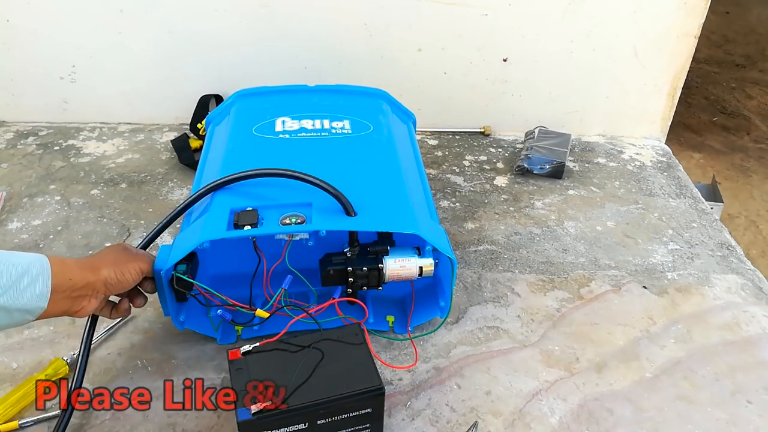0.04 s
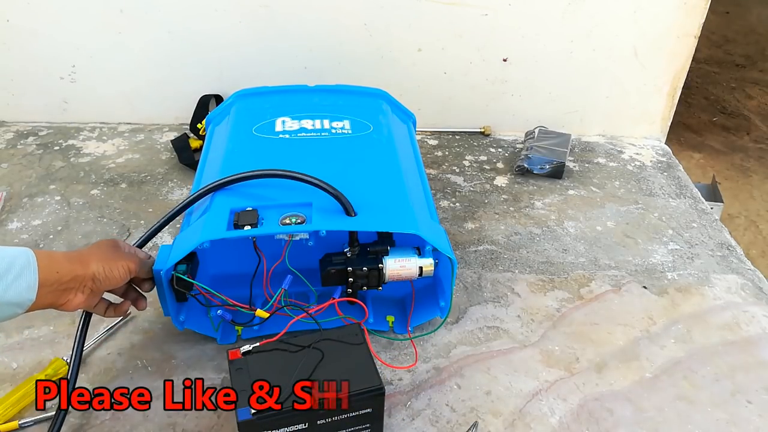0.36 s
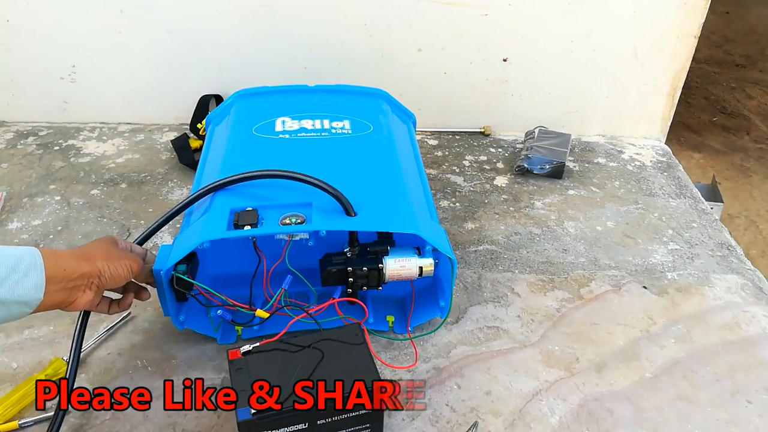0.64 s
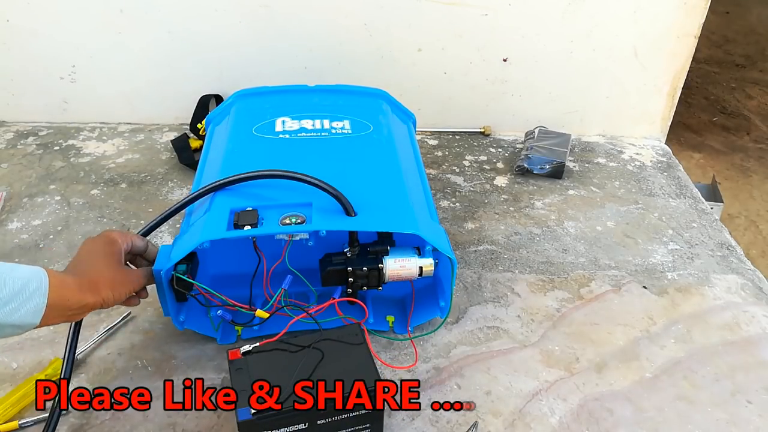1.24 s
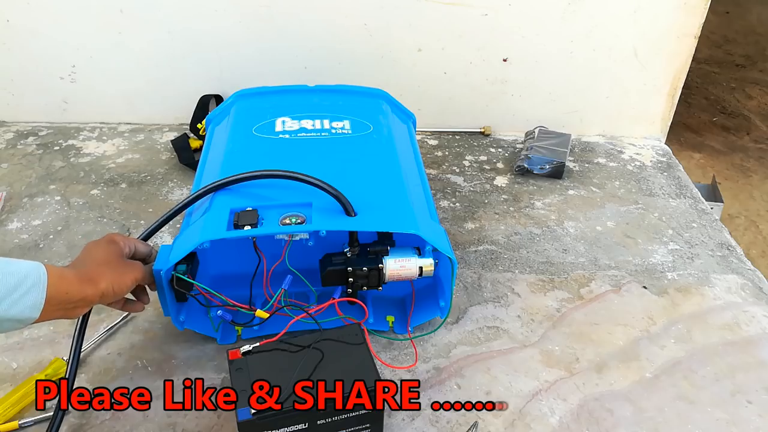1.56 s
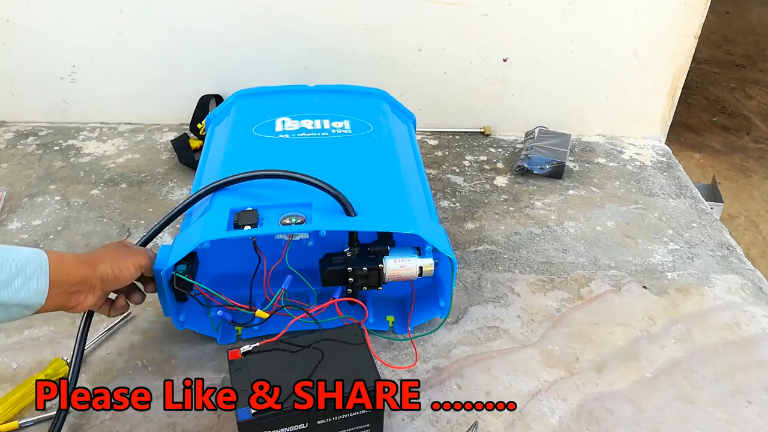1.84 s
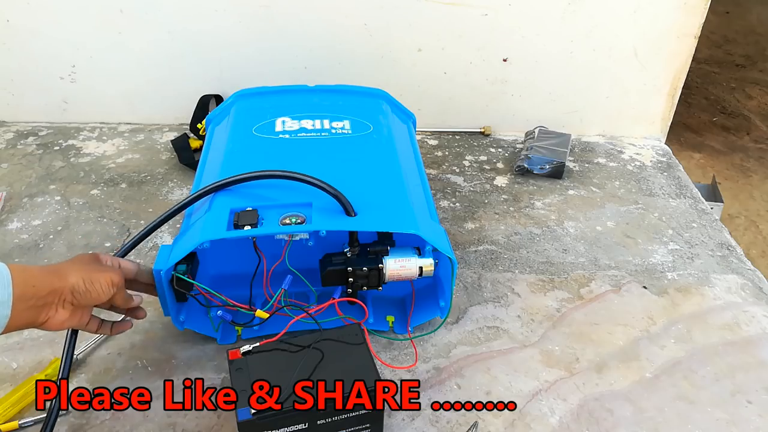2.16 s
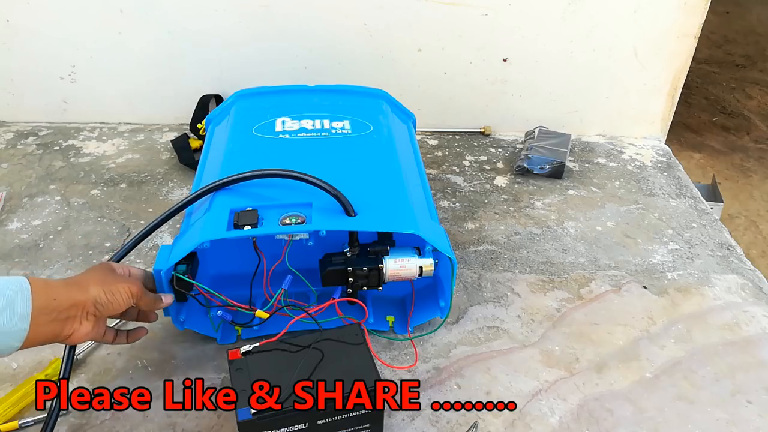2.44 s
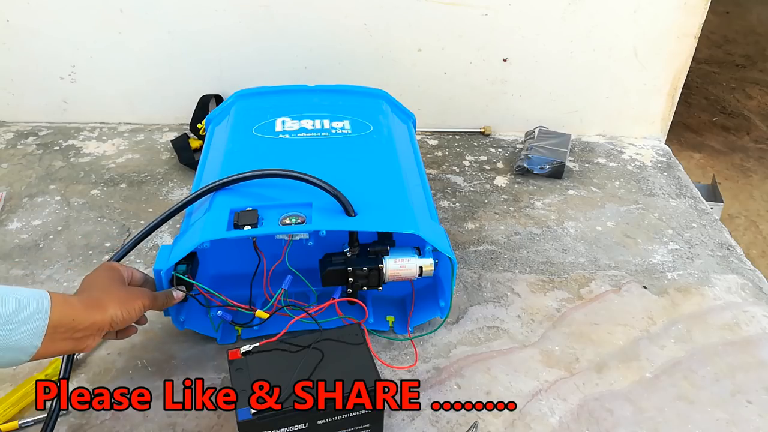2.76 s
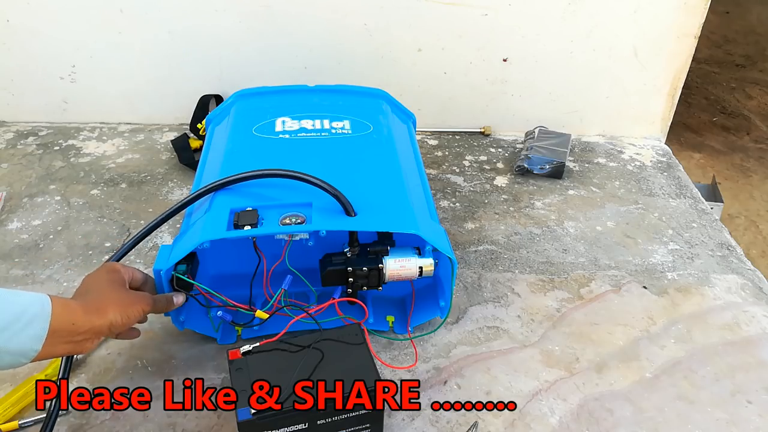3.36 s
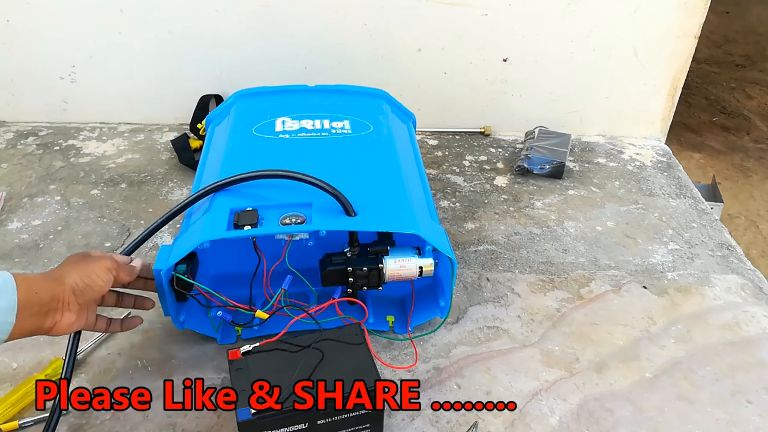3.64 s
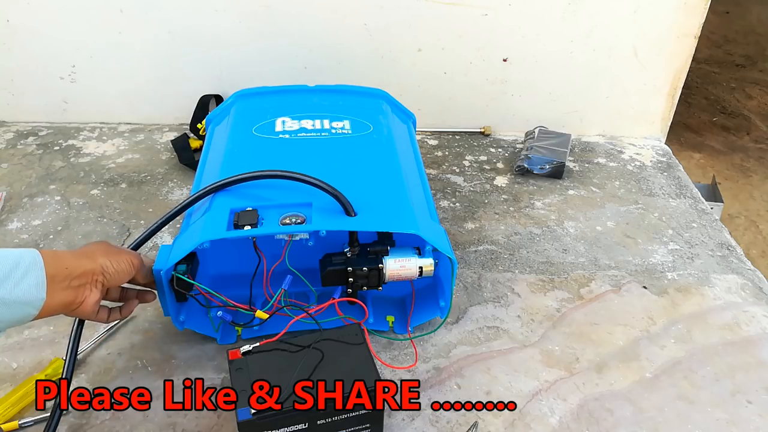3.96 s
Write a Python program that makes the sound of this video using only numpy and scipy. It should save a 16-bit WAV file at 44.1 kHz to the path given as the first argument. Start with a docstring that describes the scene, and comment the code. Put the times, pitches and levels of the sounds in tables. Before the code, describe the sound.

A small electric pump buzzes steadily in a plastic sprayer tank from the start, with a hissing whine and light rattle. At about 2.8 seconds a switch clicks sharply and the motor winds down over half a second. The switch clicks again at 3.2 seconds. Near 3.7 seconds a hand brushes faintly off the casing, leaving a quiet room.

```python
"""A sprayer pump switched off

A small electric diaphragm pump buzzes in the open base of a plastic sprayer tank. Its shaft
shakes the tank, the brushes tick and whine, and the pump head rattles. A switch clicks it off,
the motor coasts to a halt, the switch clicks again and a hand slides away in the quiet room."""
import sys
import numpy as np
from scipy import signal
from scipy.fft import rfft, irfft, next_fast_len
from scipy.io import wavfile
from scipy.ndimage import uniform_filter1d

SR = 44100
rng = np.random.default_rng(int(sys.argv[2]) if len(sys.argv) > 2 else 0)


def to_wav(s):
    """Save 16-bit WAV."""
    ch = np.atleast_2d(s).T  # columns
    pcm = np.round(np.clip(ch, -1, 1) * 32767)  # PCM
    wavfile.write(sys.argv[1], SR, pcm.astype(np.int16))


N = 176400
T = np.arange(N) / SR
SHAFT_HZ, CUTOFF_HZ = 64.52, 16000
OFF_S, COAST_S = 2.825, .47   # when the power is cut, and how long the shaft takes to stop
COASTED_S = np.maximum(T - OFF_S, 0)

# Each "colour" says how strong a sound is from low to high: (frequency [Hz], relative level [dB])
MURMUR_COLOUR = [(15, -10.5), (42, 3), (65, -5), (100, -4.5), (180, -18.5), (350, -19), (700, -28.5),
                 (1400, -30.5), (2800, -33.5), (5600, -31.5), (10000, -33), (15000, -35)]
ROOM_COLOUR = [(130, 16.5), (300, 4), (480, 3.5), (800, 11), (2000, 6), (3000, -3), (4500, 3.5),
               (6000, 0.5), (9000, -0.5), (16000, -4.5)]
RUSTLE_COLOUR = [(200, -4), (490, 3), (950, -5), (1220, 4), (2200, -14), (3000, -14), (8000, -21),
                 (14000, -40)]
TOUCH_COLOUR = [(1500, 6), (4000, -6), (7000, 6.5), (11500, -4), (16000, -4)]
BUMP_COLOUR = [(40, -20.5), (160, 2.5), (300, -5), (500, -7.5), (1000, -29), (4000, -51.5)]
PRESS_COLOUR = [(200, -21.5), (700, -4), (1400, -1), (1900, -14.5), (2700, -3.5), (3700, 3.5), (4400, -5.5),
                (6150, -7), (7800, 10.5), (8600, -3.5), (11000, -4), (16000, -4)]
RELEASE_COLOUR = [(100, -12), (400, -2.5), (1000, -15), (1480, -14.5), (2040, 8), (2350, -6.5), (3100, 2),
                  (4380, -8), (5420, -10), (6100, -6.5), (8000, -0.5), (11600, -8.5), (14700, 1),
                  (16000, -9.5)]
SHUDDER_COLOUR = [(20, -13.5), (32, -10), (43, 0.5), (55, -10.5), (80, -10.5), (105, -2), (170, -8),
                  (240, -26.5), (400, -14.5)]
SCRAPE_COLOUR = [(2000, -19), (3300, -5), (4500, -17.5), (5700, -2.5), (6500, -9.5), (7800, 4),
                 (9500, -3.5), (11600, 5), (13000, -6.5), (16000, -16)]
HISS_COLOUR = [(1500, -18.5), (4500, -9), (5100, -2.5), (5800, -3.5), (6200, -3), (7000, -5), (7700, 2.5),
               (8600, 2), (9600, -1.5), (10600, 0.5), (12000, -2.5), (14000, 0.5), (15500, -10.5),
               (16500, -15.5)]
BUZZ_COLOUR = [(10500, -39.5), (11350, -1.5), (11600, 8), (12300, -38.5)]
TICK_COLOUR = [(300, -13), (700, -2), (1300, -9), (2200, -12.5), (3000, -1.5), (4400, -10.5), (5600, 1),
               (6700, -8.5), (7800, -3), (9000, -4), (10700, 3), (12000, -3), (14000, -2), (16000, -12)]
RATTLE_COLOUR = [(240, -23), (430, -6.5), (650, -12.5), (800, -7), (920, -4), (1060, -11.5), (1240, 3.5),
                 (1500, -14), (1700, -0.5), (1850, -3.5), (2100, -19), (2450, -12.5), (2800, -10),
                 (3300, -11), (3700, -11.5), (4600, -25), (5500, -10), (7000, -24.5)]
LOW_RING_COLOUR = [(1100, -31.5), (1550, -19), (1690, 3), (1800, -0.5), (2000, -22), (2800, -39)]
HIGH_RING_COLOUR = [(2200, -35), (2900, -8.5), (3320, 1), (3750, -8), (4400, -25)]
# Which side is louder: (frequency [Hz], left minus right [dB])
PUMP_BALANCE = [(200, 2), (480, 1), (720, -0.5), (900, -8), (1170, 4), (1790, -.5), (2250, -4.5), (2800, 4),
                (3400, 4.5), (4300, 2), (5300, -4.5), (5850, -5.5), (6600, -9), (7800, -7.5), (9810, -8),
                (15000, -10)]
SWITCH_BALANCE = [(300, 2.5), (1200, -1), (1900, -12.5), (2900, 13), (4400, 4.5), (5500, -2), (11000, -6)]
# How alike the two sides sound: (frequency [Hz], likeness [0 to 1])
LIKENESS = [(140, .93), (330, .4), (600, 0), (850, .2), (1170, .86), (1790, .84), (2740, 0.69),
            (4190, 0.058), (15000, 0)]
# Hand taps and switch steps; t60 is the time to fade by 60 dB: (time [s], level [dB], t60 [s])
TOUCHES = [(3.11, -48.5, .02), (3.495, -59, 0.11)]
BUMPS = [(0.488, -45, .2), (1.238, -45, 0.17), (1.888, -35, 0.057), (2.83, -33.5, 0.12),
         (3.204, -35.5, 0.057)]
PRESS_STEPS = [(2.8255, -30, .03), (2.8291, -5.5, .012), (2.8322, -15, .028)]
RELEASE_STEPS = [(3.1995, -31.5, 0.036), (3.2024, -10, 0.019), (3.2055, -19, 0.032), (3.2165, -32, 0.036)]
# The tank's notes after a click: (frequency [Hz], t60 [s], press level [dB], release level [dB])
TANK_NOTES = [(150, .09, -41.5, -35), (292.4, 0.027, -44.5, -21), (460.6, 0.031, -23.5, -44.5),
              (1265, .08, -37.5, -42.5), (1960, 0.042, -39.5, -21.5), (2100, .4, -63, -54),
              (2990, .5, -61.5, -59), (3017, 0.021, -18.5, -15.5), (5560, .04, -32.5, -23.5),
              (7850, .03, -23, -37.5)]
# How the tank's shudder swells: (time [s], boost [dB])
SHUDDER_SWELL = [(0, 3.5), (.7, 4.5), (1.3, 6.5), (1.7, 0), (2.1, 3.5), (2.8, 6)]
# How loudly the pump head's two pitches ring: (time [s], level [dB])
LOW_RING_LEVELS = [(0, -45), (.9, -58.5), (1.398, -45), (1.699, -50), (1.95, -47), (2.15, -55), (2.8, -48),
                   (3.2, -72)]
HIGH_RING_LEVELS = [(0, -50), (1.798, -49.5), (2.3, -48.5), (2.8, -47), (3.0, -49), (3.101, -66.5),
                    (3.2, -81.5)]
# The throb of the hiss: (beats [per turn], depth [dB])
HISS_PULSES = [(2, 1.5), (3, 1.3), (5, 1.0)]
# The motor's clean tones, hum first: (cycles [per turn], level [dB])
MOTOR_TONES = [(2, -40), (5, -62), (7, -66.5), (8, -73), (9, -74.5), (10, -76), (11, -71), (12, -72.5),
               (14, -51.5), (15, -56.5), (18, -56.5), (26, -55.5), (28, -57), (42, -57), (45, -54),
               (47, -69), (50, -52.5), (53, -63.5), (60, -58.5), (75, -64), (77, -61.5), (78, -57.5),
               (84, -50.5), (85, -60), (88, -55), (89, -64), (90, -45), (91, -51), (92, -52), (97, -62.5),
               (98, -58), (122, -54.5), (163, -53.5), (166, -55), (167, -51.5), (188, -56.5), (207, -56.5),
               (217, -59.5)]


def from_db(db):
    """Turn decibels into a gain."""
    return 10 ** (np.asarray(db) / 20)


def unit_power(x):
    """Scale to an average power of 1."""
    return x / np.sqrt(np.mean(x ** 2) + 1e-20)


def at_hz(table, hz):
    """Read between a table's rows, on a scale of octaves."""
    freqs, values = np.transpose(table)
    return np.interp(np.log(hz + 1e-3), np.log(freqs), values)


def pan(db):
    """Left and right gains, db apart."""
    gains = from_db(np.array([[.5], [-.5]]) * db)
    return gains / np.sqrt(np.mean(gains ** 2, axis=0))


def noise():
    """Separate white noise for each side."""
    return rng.standard_normal((2, N))


def drift(rate_hz):
    """A smooth random wobble, about 1 in size."""
    pole = np.exp(-80 * np.pi * rate_hz / SR)
    slow = signal.lfilter([1], [1, -2 * pole, pole ** 2], rng.standard_normal(N // 40 + 502))[500:]
    return np.interp(np.arange(N) / 40, np.arange(len(slow)), unit_power(slow))


def decay(start, t60):
    """Jump to full strength, then die away."""
    return (T >= start) * from_db(-60 * np.clip((T - start) / t60, 0, 4))


def coast_fade(db_per_s):
    """A gain of 1 that falls once the power is cut."""
    return from_db(-db_per_s * COASTED_S)


def soft_filter(x, hz, keep):
    """Keep the "low" or the "high" side of hz."""
    return signal.sosfilt(signal.butter(2, hz, keep, fs=SR, output="sos"), x)


def colour(pair, spectrum, balance=None):
    """Give two unrelated signals a tone colour and blend them into left and right."""
    size = next_fast_len(N + SR // 4)
    hz = np.linspace(0, SR / 2, size // 2 + 1)
    gain = unit_power(from_db(at_hz(spectrum, hz) - 60 * (hz > CUTOFF_HZ + 1000)))
    # folding makes the filter ring after a click, never before it
    cepstrum = irfft(np.log(gain), size)
    cepstrum[1:size // 2] *= 2
    cepstrum[size // 2 + 1:] = 0
    alike = at_hz(LIKENESS, hz)
    mid, side = rfft(pair, size)
    both = np.sqrt((1 + alike) / 2) * mid + np.sqrt((1 - alike) / 2) * side * [[1], [-1]]
    sides = pan(at_hz(balance, hz) if balance else 0)
    return irfft(both * np.exp(rfft(cepstrum)) * sides, size)[:, :N]


def reflections(x, t60):
    """Dense dying echoes, different on each side."""
    echoes = rfft(rng.standard_normal((2, SR // 2)) * from_db(-60 * T[:SR // 2] / t60))
    power = uniform_filter1d(abs(echoes) ** 2, size=120, axis=1)
    return signal.fftconvolve(np.atleast_2d(x), irfft(echoes / np.sqrt(power)), axes=1)[:, :N]


def contacts(turns, count, scatter_db=3.5, slop_s=.0004):
    """Parts click unevenly, count times a turn, and echo in the hollow base."""
    angles = (np.arange(count) + rng.random(count)) / count
    strength = rng.uniform(.76, 1, count) * rng.choice([-1, 1], count)
    due = np.arange(int(SHAFT_HZ * N / SR))[:, None] + angles
    size = (strength * from_db(scatter_db * rng.standard_normal(due.shape)) * (due < turns[-1])).ravel()
    times = np.interp(due, turns, T) + slop_s * rng.standard_normal(due.shape)
    at = np.clip(times, 0, T[-2]).ravel() * SR
    whole, part = at.astype(int), at % 1   # two samples share each click
    clicks = np.bincount(whole, size * (1 - part), N) + np.bincount(whole + 1, size * part, N)
    return reflections(clicks / clicks[:int(OFF_S * SR)].std(), t60=.014)


def room_murmur():
    """The low, steady noise of the room."""
    return from_db(-63) * colour(noise(), MURMUR_COLOUR)


def room_echo(x):
    """A short echo whose treble dies first."""
    low = reflections(soft_filter(x, 3500, "low"), t60=.37)
    high = reflections(soft_filter(x, 3500, "high"), t60=.25)
    return from_db(-18.5) * colour(low + high, ROOM_COLOUR)


def hand_rustle(start_s=3.71, rise_s=.067, fade_db_per_s=84):
    """A soft, uneven brush as the hand slides off the casing."""
    rise = np.clip((T - start_s) / rise_s, 0, 1)
    fall = from_db(-fade_db_per_s * np.maximum(T - start_s - rise_s, 0))
    return from_db(-63 + 1.5 * drift(60)) * rise * fall * colour(noise(), RUSTLE_COLOUR)


def hand_taps():
    """Faint ticks of plastic and soft knocks of the hand on the tank."""
    ticks, bumps = (sum(from_db(db) * decay(s, t60) for s, db, t60 in rows) * noise()
                    for rows in (TOUCHES, BUMPS))
    return colour(ticks, TOUCH_COLOUR, SWITCH_BALANCE) + colour(bumps, BUMP_COLOUR)


def switch():
    """The rocker slides, snaps over and rebounds; the snap sets the tank ringing."""
    out = 0
    for k, (steps, spectrum) in enumerate([(PRESS_STEPS, PRESS_COLOUR), (RELEASE_STEPS, RELEASE_COLOUR)]):
        burst = np.sqrt(sum((from_db(db) * decay(s, t60)) ** 2 for s, db, t60 in steps))
        out += colour(burst * noise(), spectrum, SWITCH_BALANCE)
        snap_s = steps[1][0]
        for hz, t60, *levels_db in TANK_NOTES:
            note = decay(snap_s, t60) * np.sin(2 * np.pi * hz * (T - snap_s))
            out += from_db(levels_db[k]) * pan(at_hz(SWITCH_BALANCE, hz)) * note
    out = soft_filter(out, 120.6, "high")   # little deep bass comes with the clicks
    return out + room_echo(out)


def tank_shudder():
    """The shaft shakes the tank into a low rumble."""
    level = from_db(-54 + np.interp(T, *np.transpose(SHUDDER_SWELL)))
    return level * coast_fade(40.5) * colour(noise(), SHUDDER_COLOUR + [(2000, -71)])


def motor_can(hz=5825):
    """The motor's shell rings at its own pitch, even while coasting."""
    ring = signal.lfilter(*signal.iirpeak(hz, Q=27, fs=SR), noise())
    return from_db(-35.5) * coast_fade(56) * ring * pan(at_hz(PUMP_BALANCE, hz))


def coasting_groan(turns, per_turn=9, tank_hz=138.3, width_hz=22):
    """The slowing shaft groans, swelling as its pitch falls through the tank's lowest resonance."""
    slowed = np.minimum(COASTED_S / COAST_S, 1)
    hz = per_turn * SHAFT_HZ * (1 - slowed)
    swell_db = 16 / (1 + ((hz - tank_hz) / width_hz) ** 2)
    level = from_db(-61.5 + swell_db) * np.sin(np.pi * slowed) * (1 + 1.1 * drift(30))
    return np.sqrt(2) * level * np.sin(2 * np.pi * per_turn * turns)


def brush_scrape(angle, speed, sharpness=24, end_s=3.09):
    """The brushes catch once a turn until the shaft is too slow."""
    catch = np.exp(sharpness * (np.cos(angle) - 1)) * np.sqrt(speed / SHAFT_HZ) * (T < end_s)
    return colour(from_db(-38.5) * coast_fade(15) * catch * noise(), SCRAPE_COLOUR, PUMP_BALANCE)


def brush_hiss(angle):
    """The brushes rub with a throbbing hiss; a thin, high buzz pulses twice a turn."""
    throb_db = sum(db * np.cos(beats * angle) for beats, db in HISS_PULSES)
    throb = from_db(throb_db + 1.84 * drift(200))
    throb /= throb[T < OFF_S].mean()
    hiss = from_db(-40.5) * colour(throb * noise(), HISS_COLOUR, PUMP_BALANCE)
    buzz = colour(from_db(-54 + 9 * np.cos(2 * angle)) * noise(), BUZZ_COLOUR, PUMP_BALANCE)
    return coast_fade(85) * (hiss + buzz)


def brush_ticks(turns):
    """The brushes tick at the same points in every turn."""
    clicks = contacts(turns, count=15, scatter_db=1, slop_s=0)
    return from_db(-43.5) * coast_fade(75.5) * colour(clicks, TICK_COLOUR, PUMP_BALANCE)


def head_rattle(turns):
    """Loose knocks make the pump head rattle and ring at two pitches."""
    knocks = contacts(turns, count=12)
    out = from_db(-44) * coast_fade(40.5) * colour(knocks, RATTLE_COLOUR, PUMP_BALANCE)
    for spectrum, levels in [(LOW_RING_COLOUR, LOW_RING_LEVELS), (HIGH_RING_COLOUR, HIGH_RING_LEVELS)]:
        ring = colour(contacts(turns, count=3), spectrum, PUMP_BALANCE)
        out += from_db(np.interp(T, *np.transpose(levels))) * ring
    return out


def hum_and_whine(turns):
    """The shaking tank hums at a steady pitch; the brushes' whine follows the shaft."""
    hum = (SHAFT_HZ * T, .09, coast_fade(91.5))
    whine = (turns, .17, coast_fade(262))
    out = np.zeros((2, N))
    for k, (per_turn, db) in enumerate(MOTOR_TONES):
        cycles, waver, fade = whine if k else hum
        hz = per_turn * SHAFT_HZ
        phase = 2 * np.pi * (per_turn * cycles + rng.random())
        # high tones reach left and right out of step
        wave = np.array([np.sin(phase), np.cos(phase)]) if hz > 2000 else np.sin(phase)
        level = from_db(db) * fade * (1 + waver * drift(10))
        out += level * pan(at_hz(PUMP_BALANCE, hz)) * wave
    return np.sqrt(2) * out


def pump():
    """One shaft drives it all; with the power cut, friction slows it evenly."""
    speed = SHAFT_HZ * np.maximum(1 - COASTED_S / COAST_S, 1e-6) * (1 + .0007 * drift(8))
    turns = np.cumsum(speed) / SR
    angle = 2 * np.pi * (turns - .95)   # zero where the brushes catch
    return (brush_ticks(turns) + head_rattle(turns) + brush_hiss(angle) + tank_shudder()
            + brush_scrape(angle, speed) + motor_can() + hum_and_whine(turns) + coasting_groan(turns))


def scene():
    """Pump, switch and hand over the murmur of the room."""
    return pump() + switch() + hand_taps() + hand_rustle() + room_murmur()


def record(dry):
    """Round off the peaks and cut the highest treble."""
    return signal.sosfilt(signal.ellip(12, .1, 80, CUTOFF_HZ, fs=SR, output="sos"), np.tanh(dry))


dry = scene()
out = record(dry)
to_wav(out)
```